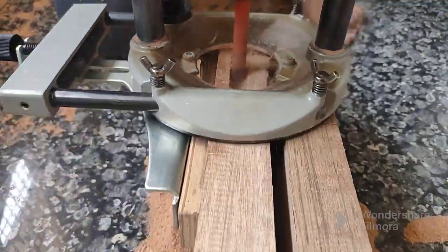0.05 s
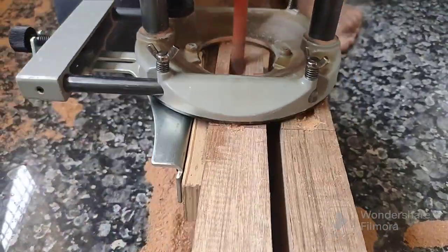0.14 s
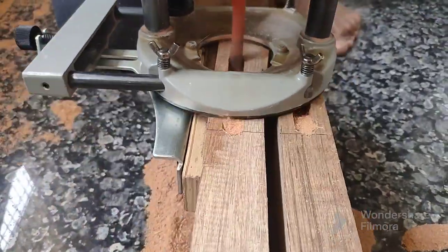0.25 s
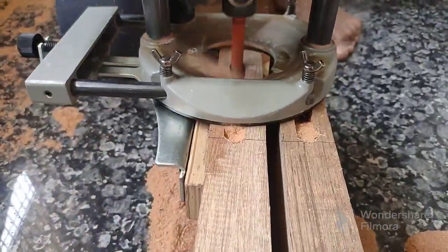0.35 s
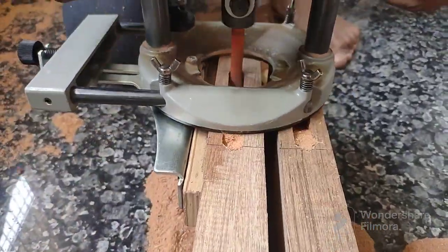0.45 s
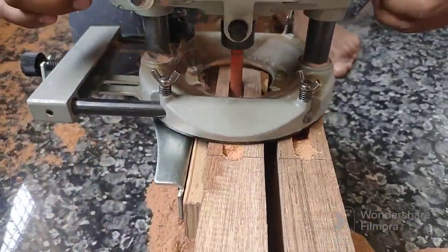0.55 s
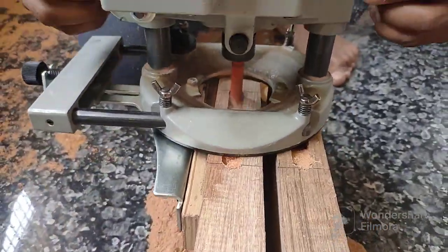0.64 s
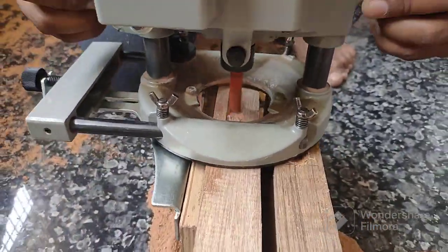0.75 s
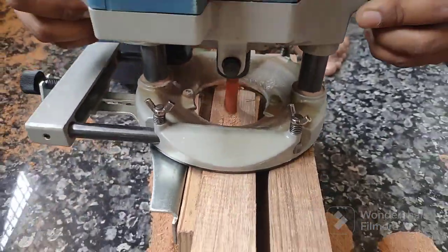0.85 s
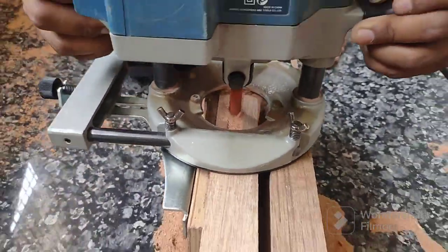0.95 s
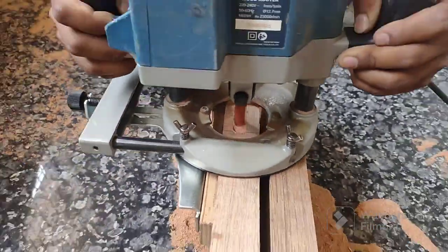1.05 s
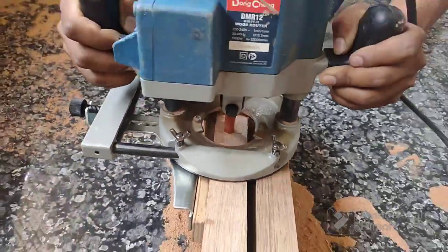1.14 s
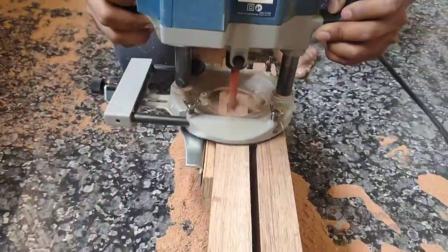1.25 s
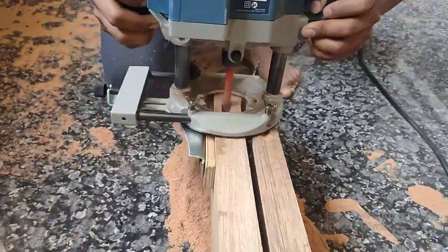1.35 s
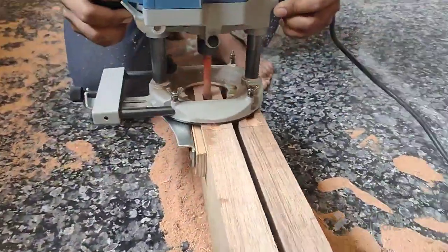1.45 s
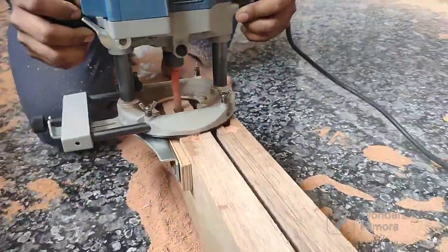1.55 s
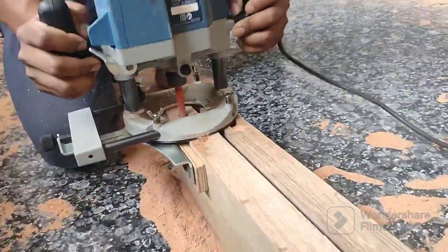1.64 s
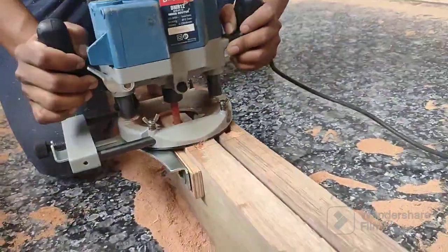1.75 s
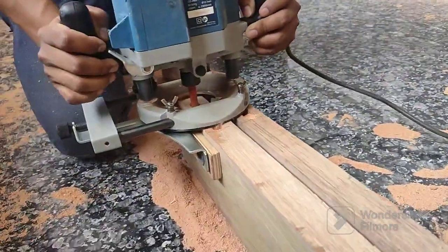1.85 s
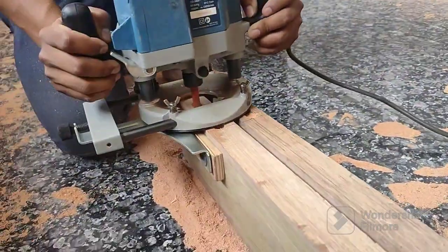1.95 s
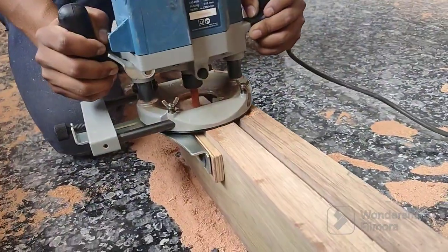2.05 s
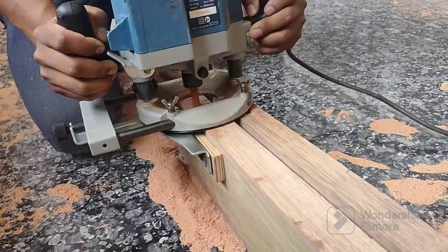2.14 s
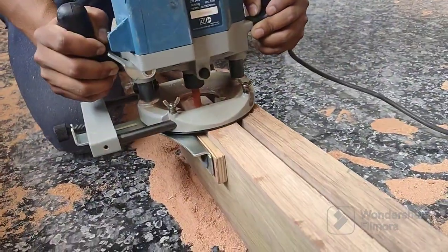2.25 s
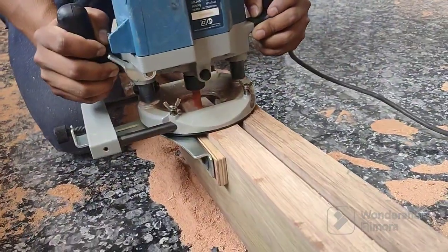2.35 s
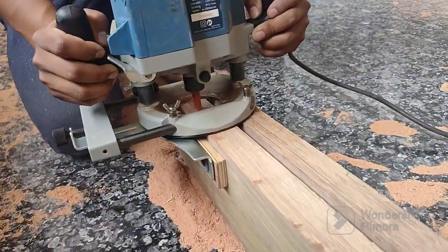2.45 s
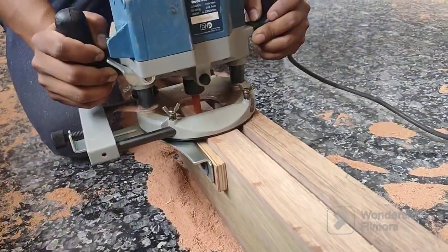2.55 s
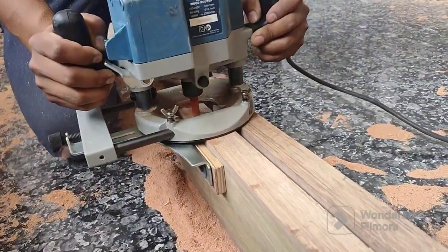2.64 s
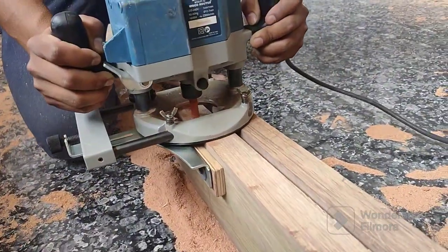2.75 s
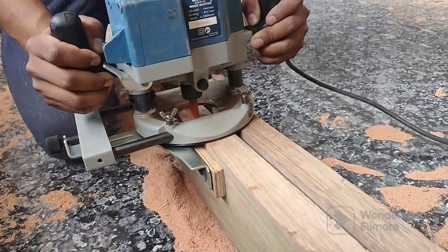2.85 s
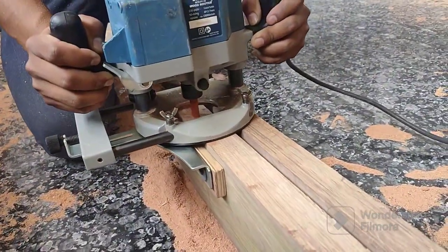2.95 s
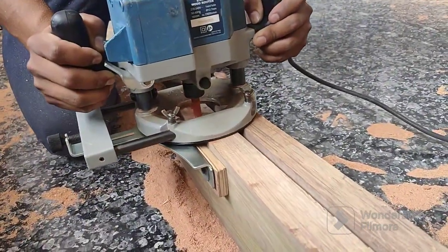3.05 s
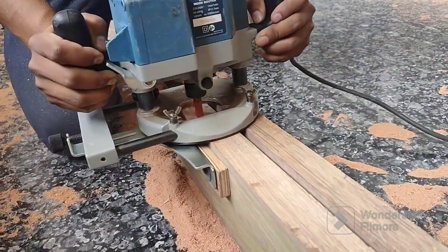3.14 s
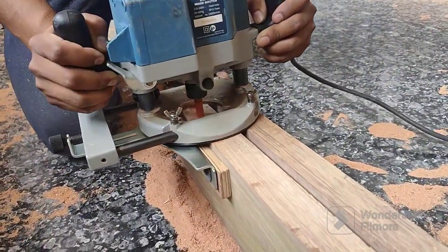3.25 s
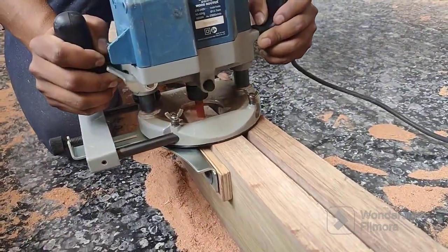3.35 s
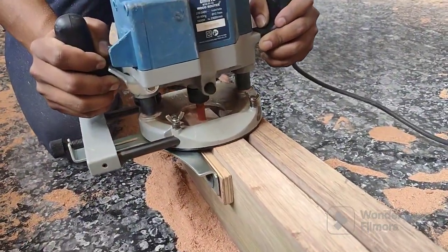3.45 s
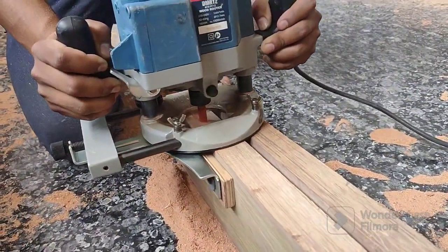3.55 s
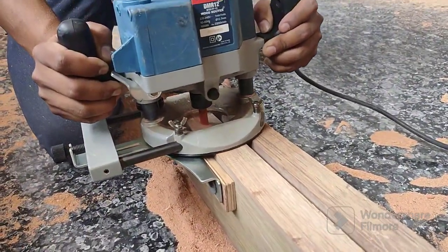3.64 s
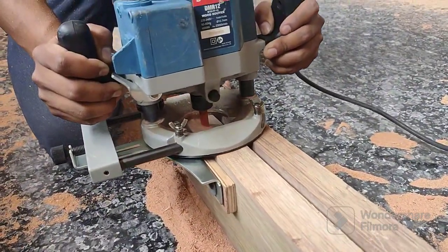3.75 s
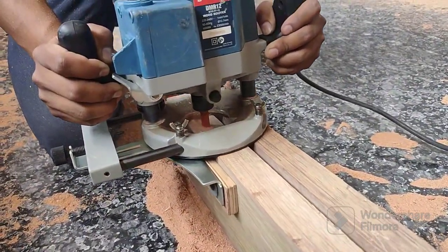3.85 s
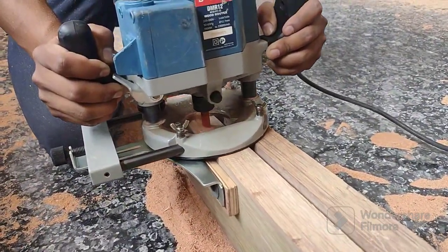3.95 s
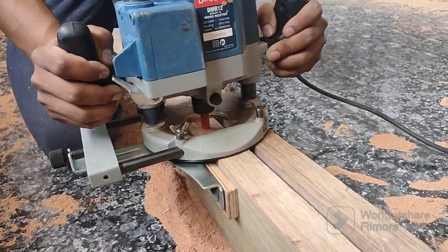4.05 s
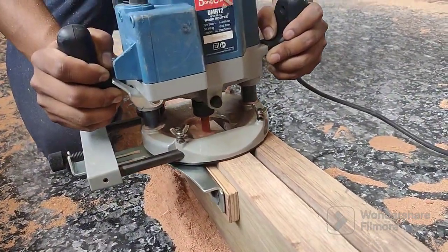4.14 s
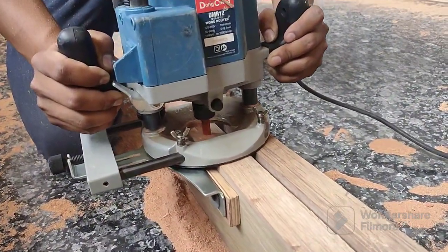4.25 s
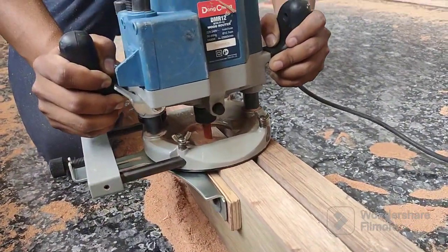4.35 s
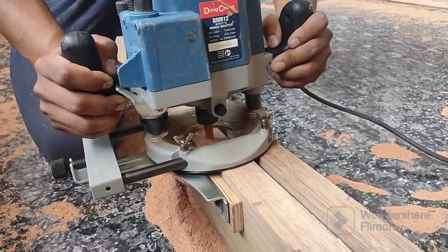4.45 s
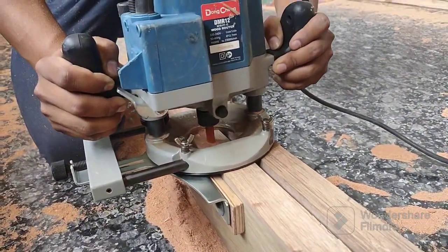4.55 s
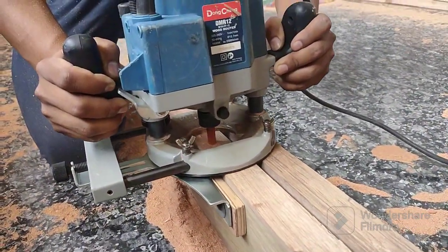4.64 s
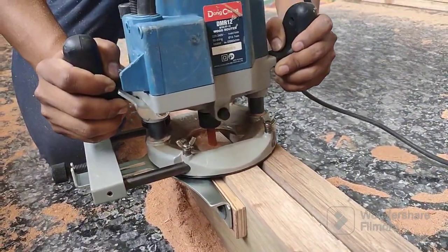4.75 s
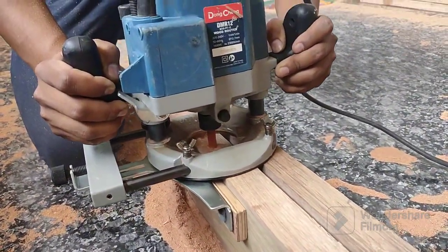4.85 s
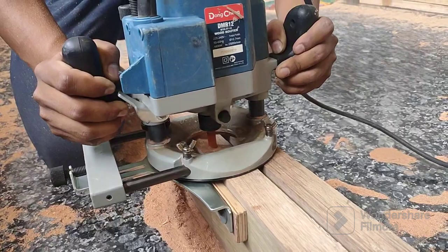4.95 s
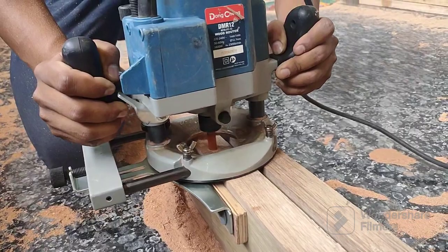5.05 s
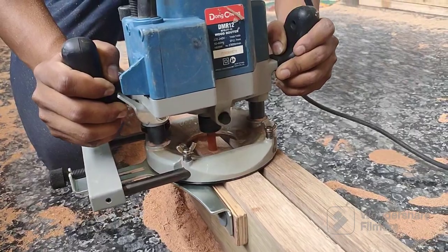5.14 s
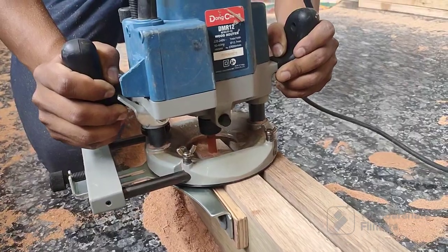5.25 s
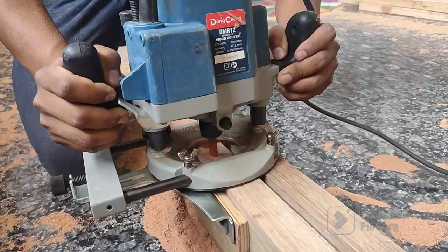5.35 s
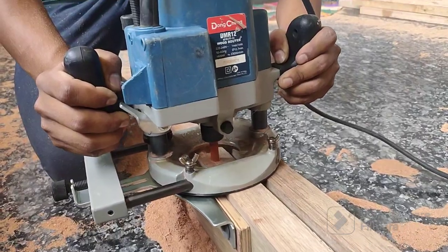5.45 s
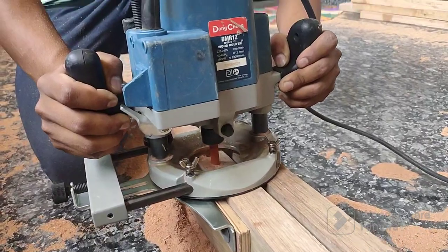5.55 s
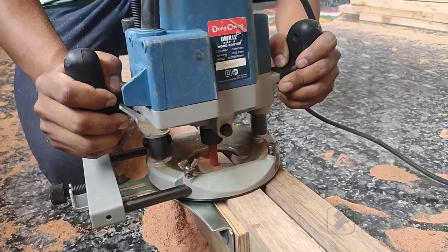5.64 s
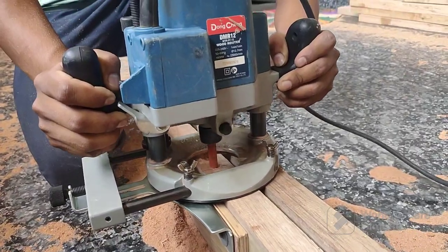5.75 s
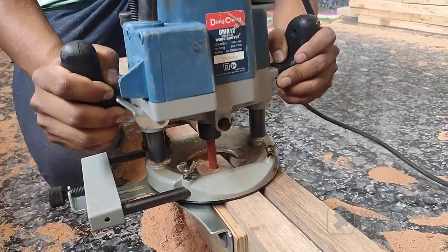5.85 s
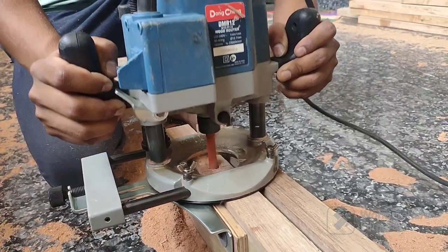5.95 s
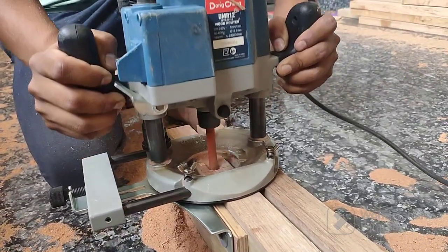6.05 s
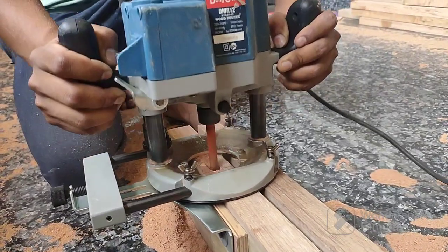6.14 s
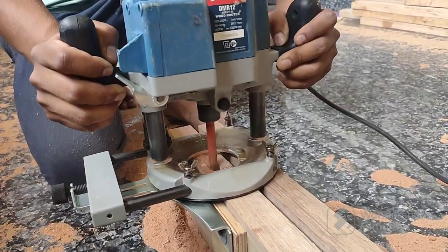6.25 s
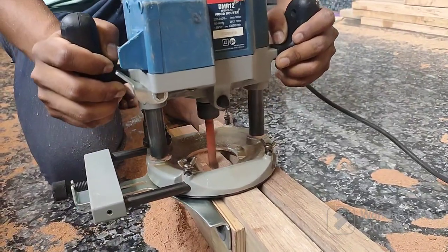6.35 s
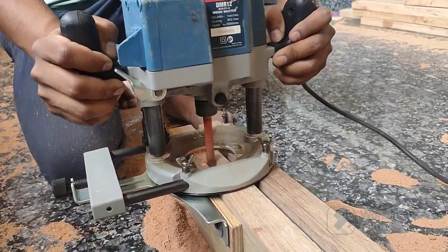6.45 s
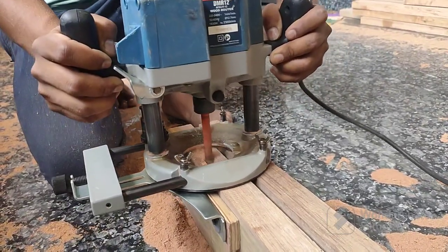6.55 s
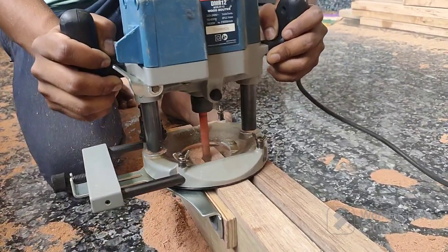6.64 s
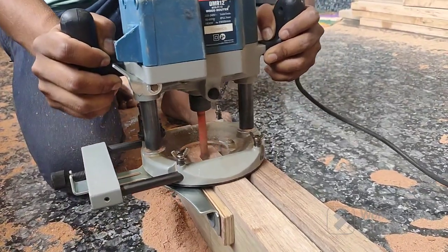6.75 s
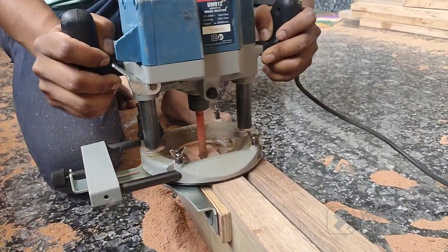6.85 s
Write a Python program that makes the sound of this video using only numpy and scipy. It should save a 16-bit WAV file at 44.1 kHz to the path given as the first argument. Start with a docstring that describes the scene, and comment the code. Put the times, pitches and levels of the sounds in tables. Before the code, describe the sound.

An electric router runs close by indoors, heard almost wholly on the left. At the start its whine rises quickly over the roar of its cooling fan. From about 0.5 seconds the bit bites into a wooden batten and the pitch sags into a rough, buzzing rasp, ending with a dull knock at 1.3 seconds. The motor races again with a thin whistle, and the base skids briefly over the wood from 1.5 to 1.8 seconds. At about 2 seconds a longer cut begins: the motor drops to a low, strained whine while the bit chatters in repeated bursts, with brief squeals and a hiss of spraying chips. A few splinters tick at around 4.2 seconds. From about 5.5 seconds the cutting gradually fades and the motor climbs in pitch, running almost freely by 6.9 seconds.

```python
"""Plunge router on a wooden batten

Two passes, close by. The motor races when the bit is free and sags when it bites.
The flutes hammer the wood on every turn, the long bit flexes and chatters, and chips spray.
The cooling fan roars and whistles; between the passes the base skids over the wood."""
import sys
import numpy as np
from scipy import signal
from scipy.fft import rfft, irfft, next_fast_len
from scipy.io import wavfile
from scipy.ndimage import uniform_filter1d

SR = 44100
rng = np.random.default_rng(int(sys.argv[2]) if len(sys.argv) > 2 else 0)


def waveform_to_disk(signal):
    """Save audio, clipped to [-1, 1], as 16-bit WAV at the path in sys.argv[1]."""
    frames = np.transpose(np.atleast_2d(signal))
    scaled = np.clip(frames, -1, 1) * 32767
    samples = np.round(scaled).astype(np.int16)
    wavfile.write(sys.argv[1], SR, samples)


N = 303402
TIME = np.arange(N) / SR
BUZZ_ATTACK_S, BUZZ_RELEASE_S = 0.044, 0.06

# Low air noise. Each row: frequency in Hz, level in dB.
RUMBLE_SPECTRUM = [(20, 0), (45, -3), (100, -7), (220, -12), (500, -25), (1500, -60)]
# Radiation of the wood. Each row: frequency in Hz, level in dB.
WOOD_SPECTRUM = [(150, -27.5), (350, -16.5), (600, -9.5), (850, -4.5), (1100, -5.5), (1400, -3.5),
                 (1900, -1), (2500, -4.5), (3100, -10), (3700, -17.5), (4600, -25), (7000, -39.5)]
# Ringing of base plate and batten. Each row: centre in Hz, width in Hz, gain in dB.
BODY_MODES = [(1190, 400, 4), (1410, 45, 7), (1740, 250, -2), (2478, 45, 6), (3010, 32, 5)]
# Tones are ragged as the bit digs in, firm in the steady cut. Each row: time in seconds, roughness 0-1.
CUT_ROUGHNESS = [(0.9, .42), (1.05, .16), (1.3, .5), (2.15, .5), (2.5, .25), (3.1, .14), (4.5, .14),
                 (5.2, .25), (5.6, .12)]


def from_db(db):
    """Decibels to gain."""
    return np.exp(np.asarray(db) * (np.log(10) / 20))


def rms_one(x):
    """Scale to unit power."""
    return x / np.sqrt(np.mean(x ** 2) + 1e-20)


def in_time(rows):
    """Each value column of a time table at every sample."""
    times_s, *columns = np.transpose(rows)
    return [np.interp(TIME, times_s, column) for column in columns]


def gate(start_s, end_s, attack_s, release_s):
    """Rise from the start, hold, fall after the end."""
    full_s = start_s + attack_s
    fall_s = max(end_s, full_s)
    return np.interp(TIME, [start_s, full_s, fall_s, fall_s + release_s], [0, 1, 1, 0])


def swells(rows, attack_s, release_s):
    """Summed gain of gated swells."""
    return sum(from_db(db) * gate(start_s, end_s, attack_s, release_s) for start_s, end_s, db in rows)


def bump(centre_s, sigma_s):
    """Gaussian pulse of height 1."""
    return np.exp(-0.5 * ((TIME - centre_s) / sigma_s) ** 2)


def dips(rows):
    """Gain with brief dropouts."""
    return np.prod([1 - bump(centre_s, sigma_s) for centre_s, sigma_s in rows], axis=0)


def with_speed(speed_hz, db, db_per_hz):
    """Gain that grows with motor speed; db applies at 300 turns per second."""
    return from_db(db + db_per_hz * (speed_hz - 300))


def drift(rate_hz):
    """Slow random signal of unit spread."""
    hop, settle = 40, 2000
    pole = np.exp(-2 * np.pi * hop * rate_hz / SR)
    noise = rng.standard_normal(N // hop + settle + 2)
    slow = rms_one(signal.lfilter([1], [1, -2 * pole, pole * pole], noise)[settle:])
    return (slow[:-1, None] + np.outer(np.diff(slow), np.arange(hop) / hop)).ravel()[:N]


def gain_at(spectrum, hz):
    """Gain of a spectrum, read on a log-frequency axis."""
    points_hz, points_db = np.transpose(spectrum)
    return from_db(np.interp(np.log(np.maximum(hz, 1)), np.log(points_hz), points_db))


def resonances(modes, hz):
    """Gain of a set of resonances."""
    return from_db(sum(db / (1 + (2 * (hz - mid_hz) / width_hz) ** 2) for mid_hz, width_hz, db in modes))


def coloured(x, spectrum, modes=()):
    """Give a flat excitation a spectrum and resonances; unit power."""
    size = next_fast_len(N)
    hz = np.fft.rfftfreq(size, 1 / SR)
    shaped = rfft(x, size) * gain_at(spectrum, hz) * resonances(modes, hz)
    return rms_one(irfft(shaped, size)[:N])


def angle_of(hz):
    """Running phase in radians."""
    return 2 * np.pi * np.cumsum(hz) / SR


def partial(angle, rough, flutter_hz):
    """Unit-power tone of which the share `rough` flutters in strength and phase."""
    rough = np.clip(rough, 0, 1)
    angle = angle + 2 * np.pi * rng.random()
    in_phase = np.sqrt(2 * (1 - rough)) + np.sqrt(rough) * drift(flutter_hz)
    quadrature = np.sqrt(rough) * drift(flutter_hz)
    return in_phase * np.cos(angle) + quadrature * np.sin(angle)


def strokes(turn, depth, second_flute):
    """Noise pulsing with the rotation; one flute takes the thicker chip."""
    return rng.standard_normal(N) * np.exp(depth * (np.cos(turn) + second_flute * np.cos(2 * turn)))


def workshop(x, t60_s=0.087, gap_s=0.004):
    """Dense reflections from floor and walls."""
    t = TIME[:SR // 2]
    tail = rng.standard_normal(len(t)) * from_db(-60 * t / t60_s) * (t > gap_s)
    return signal.fftconvolve(x, tail / np.linalg.norm(tail))[:N]


def scattered(x):
    """Direct sound plus reflections whose peaks and notches shift as the router moves."""
    blend = 1.3 * drift(0.8)
    return 0.6 * x + 0.8 * (np.cos(blend) * workshop(x) + np.sin(blend) * workshop(x))


def rumble():
    """Low air noise at unit power."""
    return coloured(rng.standard_normal(N), RUMBLE_SPECTRUM)


def draught():
    """The exhaust stirs the air and now and then puffs at the listener."""
    # Each row: time in seconds, level in dB, sigma in seconds.
    puffs = [(0.925, -39, 0.018), (1.17, -46, .01), (1.237, -39, 0.012), (1.298, -31, 0.012),
             (2.18, -53, .025), (5.565, -44, 0.03), (6.57, -60, .08)]
    puff_gain = sum(from_db(db) * bump(centre_s, sigma_s) for centre_s, db, sigma_s in puffs)
    return (from_db(-66.5 + 4.5 * drift(5)) + puff_gain) * rumble()


def skid():
    """The base plate rubs over the batten between the passes."""
    # Each row: time in seconds, level in dB.
    rub_levels = [(1.4, -75), (1.47, -46), (1.505, -35), (1.57, -38), (1.64, -39), (1.81, -36.5),
                  (1.835, -75)]
    # Each row: frequency in Hz, level in dB.
    rub_spectrum = [(1500, -24), (2900, -4.5), (3400, -3), (4400, -8), (6000, -16), (9500, -22),
                    (13000, -20), (15000, -35)]
    level_db, = in_time(rub_levels)
    return from_db(level_db + 0.94 * drift(32)) * coloured(rng.standard_normal(N), rub_spectrum)


def knock(at_s=1.27, level_db=-29):
    """A dull knock as the plunge base is lifted and knocks."""
    # Each row: frequency in Hz, level in dB.
    knock_spectrum = [(120, -11), (400, 2), (1400, 1), (2400, 7), (4500, -40)]
    envelope = gate(at_s, at_s, attack_s=0.028, release_s=0.07) ** 2
    return from_db(level_db) * envelope * coloured(rng.standard_normal(N), knock_spectrum)


def splinters(t60_s=0.022):
    """Splinters snap off and tick against the base plate."""
    # Each row: time in seconds, pitch in Hz, level in dB.
    ticks = [(4.206, 1900, -25), (4.226, 2070, -31), (4.244, 1874, -21)]
    t = TIME[:SR // 20]
    out = np.zeros(N)
    for start_s, hz, db in ticks:
        first = int(start_s * SR)
        out[first:first + len(t)] += from_db(db - 60 * t / t60_s) * np.sin(2 * np.pi * hz * t)
    return out


def fan_roar(turn):
    """Cooling air rushes through the resonant vents."""
    # Each row: frequency in Hz, level in dB.
    air_spectrum = [(100, -23), (300, -15.5), (520, -8), (720, -5.5), (950, 4.5), (1200, -1), (1700, -1),
                    (2400, 5.5), (3100, 0.5), (3800, -9.5), (4500, -20), (7000, -26.5)]
    # Each row: centre in Hz, width in Hz, gain in dB.
    vent_modes = [(930, 260, 2.1), (1393, 110, 5.7), (1730, 140, 0.55), (2430, 260, 3.7), (2840, 61, 5.7),
                  (3400, 240, 4.2)]
    return coloured(strokes(turn, depth=0.22, second_flute=0.12), air_spectrum, vent_modes)


def fan_whistle(speed_hz, turn, blades=14):
    """Blade tone, fluttering in turbulent air; its octave appears only near full speed."""
    # Each row: start in seconds, end in seconds, level in dB.
    whistle_swells = [(0.07, 0.2, -52), (0.24, 0.33, -50), (0.51, 0.73, -53), (1.385, 1.46, -55),
                      (1.49, 1.57, -42), (1.6, 1.89, -52), (1.7, 1.8, -40.5), (1.93, 1.98, -48),
                      (2.0, 2.11, -54), (6.54, 6.72, -45), (6.8, 6.88, -48)]
    gain = with_speed(speed_hz, db=-60, db_per_hz=0.1)
    gain += swells(whistle_swells, attack_s=0.034, release_s=0.024)
    tone = partial(blades * turn, rough=0.25, flutter_hz=20)
    octave = partial(2 * blades * turn, rough=0.45, flutter_hz=12)
    octave_db = -9.5 + 0.35 * (speed_hz - speed_hz.max())
    return gain * (tone + from_db(octave_db) * octave)


def dust(speed_hz, turn, thrown):
    """Air hisses through the base and throws spurts of wood dust against it."""
    # Each row of both: frequency in Hz, level in dB.
    hiss_spectrum = [(2500, -4.5), (3600, 0), (4700, 4), (5600, 1.5), (7000, -2), (9000, -10), (12000, -46)]
    spray_spectrum = [(4000, -34), (7500, -1), (9500, 0), (11000, 4.5), (13000, 3.5), (14200, -6),
                      (15500, -52)]
    hiss_gain = np.hypot(with_speed(speed_hz, db=-52.5, db_per_hz=0.1583), from_db(-43.5) * thrown)
    spray_gain = np.hypot(with_speed(speed_hz, db=-58.5, db_per_hz=0.1583), from_db(-47.5) * thrown)
    spurts = from_db(1.1 * drift(15.6) + 0.3 * drift(68))
    air = strokes(turn, depth=0.047, second_flute=0.24) * spurts
    grains = strokes(turn, depth=0.059, second_flute=0.18) * spurts
    grains *= from_db(0.52 * rng.exponential(1, N))
    return hiss_gain * coloured(air, hiss_spectrum) + spray_gain * coloured(grains, spray_spectrum)


def motor(strain_range_hz=7.6):
    """Turns per second, and strain, which reaches 1 at the slowest speed."""
    # Each row: time in seconds, turns per second.
    speed_curve = [(0.0, 275), (0.12, 329), (0.26, 354), (0.45, 363.5), (0.52, 349), (0.73, 330),
                   (0.8, 319.5), (0.87, 302), (0.99, 279), (1.2, 276), (1.31, 264), (1.42, 322),
                   (1.55, 353), (1.8, 364), (1.86, 350), (2.07, 327), (2.21, 277), (2.34, 271),
                   (2.6, 261.3), (3.0, 259.7), (3.45, 258), (3.65, 258), (3.87, 256.4), (4.15, 257.4),
                   (4.5, 261.2), (4.84, 268), (5.12, 269), (5.5, 273.6), (5.7, 274.3), (5.94, 284.5),
                   (6.06, 292.6), (6.38, 313.5), (6.88, 330)]
    speed_hz, = in_time(speed_curve)
    strain = np.exp((speed_hz.min() - speed_hz) / strain_range_hz)
    grain_tug = 1 + 0.0012 * drift(20.2)
    return speed_hz * grain_tug, strain


def shaft_hum(speed_hz, turn, waver_db=3):
    """The unbalanced shaft hums at the turning rate, louder with speed."""
    # Each row: start in seconds, end in seconds, level in dB.
    hum_swells = [(0.07, 0.33, -35.5), (2.2, 2.85, -47), (4.35, 5.6, -51.5), (4.65, 5.2, -42.5),
                  (6.52, 6.88, -56)]
    # Each row: time in seconds, sigma in seconds.
    dropouts = [(0.07, .015), (0.49, .018), (0.97, .03), (1.48, .015), (2.17, .035), (6.08, .045),
                (6.4, .025)]
    gain = with_speed(speed_hz, db=-53.5, db_per_hz=0.1366) * from_db(waver_db * drift(9))
    gain += swells(hum_swells, attack_s=0.096, release_s=0.17)
    return gain * dips(dropouts) * partial(turn, rough=0.025, flutter_hz=12)


def flute_beat(speed_hz, turn, depth, strain, bite, racing, waver_db=3):
    """Two flutes beat at twice the turning rate: strong under strain, ragged in free air."""
    # The flutes dig in. Each row: start in seconds, end in seconds, level in dB.
    digs = [(0.82, 0.88, -34), (2.03, 2.1, -30), (2.26, 2.36, -36), (4.3, 4.52, -41.5)]
    # Each row: time in seconds, sigma in seconds.
    dropouts = [(0.68, .014), (0.925, .022), (2.17, .018), (5.9, .012), (5.99, .012)]
    in_wood = depth * (from_db(-37.5) + from_db(-33.5) * strain)
    in_air = with_speed(speed_hz, db=-58, db_per_hz=0.3155)
    gain = in_wood + in_air + swells(digs, BUZZ_ATTACK_S, BUZZ_RELEASE_S)
    waver = from_db(waver_db * racing * (drift(9) - 0.5))
    tone = partial(2 * turn, rough=0.008 + 0.8 * (1 - bite) ** 2, flutter_hz=25)
    return gain * waver * dips(dropouts) * tone


def flute_buzz(turn, depth, racing):
    """The hammering flutes buzz on harmonics 3-5 of the turning rate."""
    # Level in dB of each harmonic in a smooth cut.
    smooth_db = [-44.5, -40.5, -34.5]
    # Each row: start in seconds, end in seconds, levels in dB of harmonics 3, 4 and 5.
    buzzes = [(-0.06, -0.027, -24, -46, -24), (0.541, 0.612, -34.5, -29, -42), (0.663, 0.73, -40, -32, -41),
              (1.13, 1.29, -38.5, -39, -41), (1.762, 1.889, -54, -34, -40), (1.964, 1.999, -38, -26, -37),
              (2.047, 2.2, -31, -53, -56), (2.235, 2.37, -49, -52, -34), (4.228, 4.616, -64, -49, -31),
              (4.688, 5.115, -37, -33.5, -29.5), (5.238, 5.358, -30.5, -27, -27.5),
              (5.494, 5.586, -27, -32, -28.5), (5.659, 5.763, -38, -48, -38),
              (5.789, 5.928, -36, -41.5, -35)]
    bursts = sum(np.outer(from_db(db), gate(start_s, end_s, BUZZ_ATTACK_S, BUZZ_RELEASE_S))
                 for start_s, end_s, *db in buzzes)
    gains = np.hypot(np.outer(from_db(smooth_db), depth), bursts)
    return sum(gain * partial(k * turn, rough=0.12 + 0.4 * racing, flutter_hz=14)
               for k, gain in enumerate(gains, start=3))


def squeals(turn):
    """Single harmonics catch a resonance of wood or base and sing out."""
    # Each row: start in seconds, end in seconds, harmonic number, level in dB.
    notes = [(0.6, 0.74, 7, -32), (0.93, 1.16, 9, -31), (1.0, 1.1, 6, -31), (2.27, 2.36, 9, -38),
             (2.52, 2.57, 10, -34), (2.69, 2.78, 10, -35), (3.3, 4.25, 6, -37), (3.4, 4.5, 8, -38),
             (5.5, 5.56, 9, -35), (5.49, 5.55, 11, -33.5), (5.55, 5.62, 8, -33), (5.55, 5.61, 6, -33)]
    return sum(from_db(db) * gate(start_s, end_s, BUZZ_ATTACK_S, BUZZ_RELEASE_S)
               * partial(k * turn, rough=0.12, flutter_hz=14) for start_s, end_s, k, db in notes)


def grain():
    """Gain of one tone as it swells and breaks up in the changing grain."""
    return from_db(4.2 * np.tanh(drift(4.5)) - 0.8)


def edge_ring(speed_hz, turn, chatter_hz):
    """The cutting edges ring grittily on high harmonics, and beside them as the bit flexes."""
    # Each row: frequency in Hz, level in dB.
    edge_spectrum = [(4200, -3.5), (4600, -3.5), (5000, -9), (5500, -11)]
    flex = angle_of(chatter_hz)
    harmonics = [(k * speed_hz, k * turn) for k in range(18, 22)]
    sidebands = [(chatter_hz + k * speed_hz, flex + k * turn) for k in range(13, 18)]
    return sum(gain_at(edge_spectrum, hz) * grain() * partial(angle, rough=0.9, flutter_hz=28)
               for hz, angle in harmonics + sidebands)


def bit_chatter(strain, spread_s=0.22):
    """The bit bends in bursts and trembles under strain: tone, pitch, share of the cut's tones."""
    # Each row: start in seconds, end in seconds, first pitch in Hz, last pitch in Hz, level in dB.
    bursts = [(0.787, 0.936, 912, 821, -29.5), (0.999, 1.27, 1017, 991, -50), (1.952, 2.02, 1022, 985, -30),
              (2.104, 2.188, 900.5, 833, -25.5), (2.239, 2.311, 990, 968, -34),
              (2.39, 2.412, 938, 912, -20.5), (2.524, 2.543, 913, 903, -19), (2.653, 2.699, 886, 906, -29),
              (2.837, 2.879, 896, 926, -21.5), (2.947, 3.019, 904, 889, -34),
              (3.092, 3.144, 924, 934, -26.5), (3.204, 3.31, 936, 936, -24.5),
              (3.389, 3.501, 932, 931, -27), (3.581, 3.697, 927, 938, -26),
              (3.764, 3.85, 924, 922.5, -27.5), (4.009, 4.072, 914, 922, -36),
              (4.201, 4.352, 927, 940, -40), (4.415, 4.48, 933.5, 927, -52), (4.589, 4.69, 945.4, 954, -29),
              (4.811, 5.234, 945, 980, -32)]
    start_s, end_s, first_hz, last_hz, db = np.transpose(bursts)
    hz = np.interp(TIME, np.ravel([start_s, end_s], "F"), np.ravel([first_hz, last_hz], "F"))
    burst_gain = swells(zip(start_s, end_s, db), attack_s=0.018, release_s=0.03)
    gain = np.hypot(burst_gain, from_db(-31) * strain)
    tone = gain * partial(angle_of(hz), rough=0.2, flutter_hz=25)
    near_burst = uniform_filter1d((burst_gain > 0) * 1.0, int(spread_s * SR))
    rough, = in_time(CUT_ROUGHNESS)
    flex_share = np.clip(0.1 + (0.2 + 0.42 * rough) * near_burst, 0, 1)
    return tone, hz, flex_share


def hand_feed():
    """Depth of the bit in the wood, and the gains of its noise and its dust."""
    # Each row: entry, attack, start of exit and release in seconds, level in dB, dust in dB.
    cuts = [(-0.2, 0.1, 0.012, 0.075, -28.5, -11), (0.36, 0.34, 1.284, 0.069, -24, -7.5),
            (1.76, 0.31, 5.3, 1.18, -24, 0.5)]
    # The hand pushes or eases. Each row: time in seconds, sigma in seconds, gain in dB.
    pushes = [(0.46, 0.014, 1), (0.96, 0.026, -5.5), (1.311, 0.012, 6), (1.883, 0.037, -17),
              (1.985, 0.023, 1), (2.17, 0.0098, 3.5), (2.27, 0.05, -4), (2.494, 0.017, -4),
              (2.571, 0.031, 1.5), (2.648, 0.017, -2.5), (2.726, 0.019, 0), (3.09, 0.046, -1.5),
              (3.819, 0.082, 2), (4.099, 0.16, -1.5), (4.45, 0.02, 0), (4.753, 0.018, 0),
              (4.592, 0.081, -2), (4.931, 0.052, 0.5), (5.149, 0.034, -3), (5.426, 0.061, -3.5),
              (5.555, 0.036, 4), (5.761, 0.12, -4.5), (6.013, 0.031, 2)]
    push = from_db(sum(db * bump(centre_s, sigma_s) for centre_s, sigma_s, db in pushes))
    depth, cut_gain, dust_gain = np.zeros((3, N))
    for start_s, attack_s, end_s, release_s, level_db, dust_db in cuts:
        cut = gate(start_s, end_s, attack_s, release_s)
        cut = np.where(TIME > end_s, cut ** 2, cut)   # the last fibres give way gradually
        depth += cut
        cut_gain += from_db(level_db) * cut
        dust_gain += from_db(dust_db) * cut
    return depth, push * cut_gain, push ** 1.42 * dust_gain


def body_tone(hz, angle, rough, wander_hz=4):
    """One wavering tone of the cut, radiated by wood and base plate."""
    grid_hz = np.geomspace(100, 10000, 600)
    response = gain_at(WOOD_SPECTRUM, grid_hz) * resonances(BODY_MODES, grid_hz)
    gain = np.interp(np.abs(hz), grid_hz, response)
    waver = angle_of(wander_hz * drift(8))
    return gain * grain() * partial(angle + waver, rough, flutter_hz=21.2)


def rasp_tilt(x, tilt_db, split_hz=2150):
    """Shift weight from the low band to the upper rasp as the tilt rises."""
    upper = signal.sosfiltfilt(signal.butter(4, split_hz, "high", fs=SR, output="sos"), x)
    return from_db(-0.5 * (tilt_db + 2.5)) * (x - upper) + from_db(tilt_db + 3) * upper


def cutting(speed_hz, turn, chatter_hz, flex_share):
    """Flute blows give harmonics, the flexing bit adds lines between them, and torn fibres rasp."""
    # Level in dB of harmonics 6-13 of the turning rate.
    blow_db = [-2, -4, -3, -2.5, -1.5, -3.5, -7, -16]
    # Level in dB of the lines 1-9 turning rates above the chatter.
    sideband_db = [1.5, -2.5, 0, -7, 2.5, 0.5, -3.5, -0.5, 3]
    rough, = in_time(CUT_ROUGHNESS)
    flex = angle_of(chatter_hz + 36.24 * rough * drift(14.2))
    blows = sum(from_db(db) * body_tone(k * speed_hz, k * turn, rough)
                for k, db in enumerate(blow_db, start=6))
    above = sum(from_db(db) * body_tone(chatter_hz + k * speed_hz, flex + k * turn, rough)
                for k, db in enumerate(sideband_db, start=1))
    below = sum(body_tone(k * speed_hz - chatter_hz, k * turn - flex, rough=0.4) for k in (9, 10, 11))
    # the bit jumps clear of the wood, which doubles the flexing rate
    jumps = sum(body_tone(2 * chatter_hz + k * speed_hz, 2 * flex + k * turn, rough=0.4)
                for k in (2, 3, 5))
    tearing = strokes(turn, depth=0.42, second_flute=0.16) * from_db(1.86 * drift(100))
    fibres = from_db(-9.3 + 2 * rough) * coloured(tearing, WOOD_SPECTRUM, BODY_MODES)
    hammered = from_db(-7) * np.sqrt(1 - flex_share) * blows
    flexed = from_db(-7.5) * np.sqrt(flex_share) * (above + from_db(-4) * below + from_db(-3) * jumps)
    uneven_feed = from_db(0.72 * drift(15.3))
    return uneven_feed * (hammered + flexed + fibres)


def scene():
    """The router, heard almost wholly on the left."""
    # Nearness of the vents, closest at first. Each row: time in seconds, gain in dB.
    vent_nearness = [(0.48, 1.5), (0.52, -1.3), (1.1, -1), (1.45, -3.3), (6.0, -4.2)]
    near_db, = in_time(vent_nearness)
    speed_hz, strain = motor()
    turn = angle_of(speed_hz)
    racing = (speed_hz - speed_hz.min()) / np.ptp(speed_hz)
    depth, cut_gain, dust_gain = hand_feed()
    chatter, chatter_hz, flex_share = bit_chatter(strain)

    roar_gain = with_speed(speed_hz, db=-34.5 + near_db, db_per_hz=0.1259)
    bite = cut_gain ** 2 / (cut_gain ** 2 + roar_gain ** 2)   # 0 free, near 1 cutting
    tilt_db = -6 + bite * (6.5 * strain + 5 * flex_share) + 0.22 * near_db
    cut = cut_gain * cutting(speed_hz, turn, chatter_hz, flex_share)
    work = rasp_tilt(cut + roar_gain * fan_roar(turn), tilt_db)

    # the treble dips briefly after the first pass
    treble_dip = from_db(-9.5 * gate(1.305, 1.305, attack_s=0.02, release_s=0.16))
    thrown = dust_gain * from_db(0.5 * strain)
    grit = from_db(-53) * thrown * edge_ring(speed_hz, turn, chatter_hz)
    whistle = treble_dip * fan_whistle(speed_hz, turn)
    machine = work + chatter + squeals(turn) + grit + whistle + skid() + splinters() + knock()
    chips = treble_dip * scattered(dust(speed_hz, turn, thrown))
    beat = flute_beat(speed_hz, turn, depth, strain, bite, racing)
    spindle = shaft_hum(speed_hz, turn) + beat + flute_buzz(turn, depth, racing)
    router = spindle + machine + from_db(-7.5) * workshop(machine) + chips + draught()
    right = from_db(-41) * router + from_db(-38) * workshop(work) + from_db(-77) * rumble()
    return np.array([2 * router, right])


def record(dry):
    """Steep low-pass, 70 dB down from 16 kHz."""
    return signal.sosfilt(signal.cheby2(12, 70, 16000, fs=SR, output="sos"), dry)


dry = scene()
out = record(dry)
waveform_to_disk(out)
```